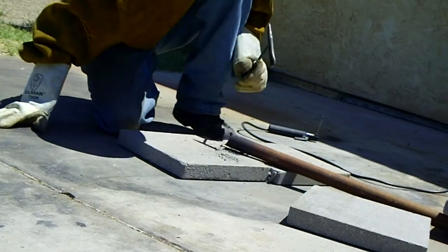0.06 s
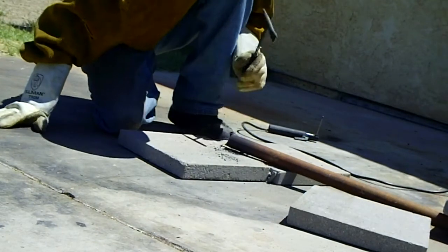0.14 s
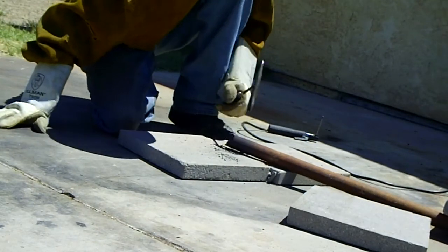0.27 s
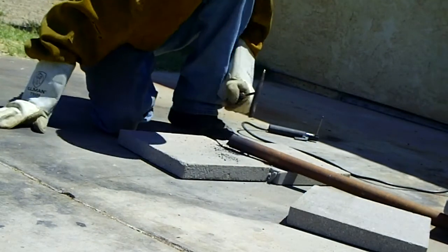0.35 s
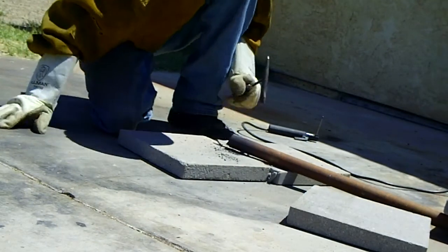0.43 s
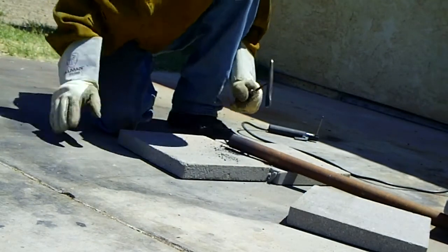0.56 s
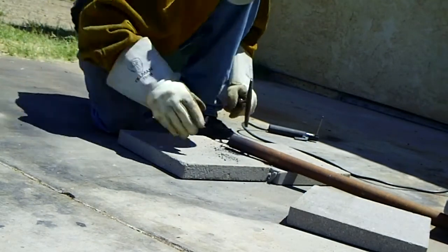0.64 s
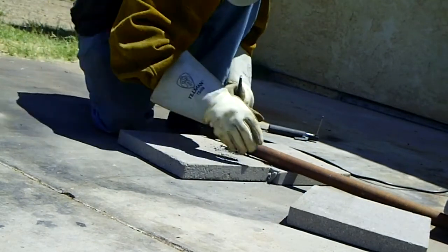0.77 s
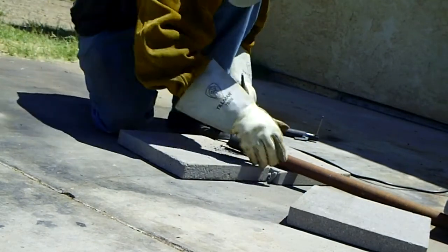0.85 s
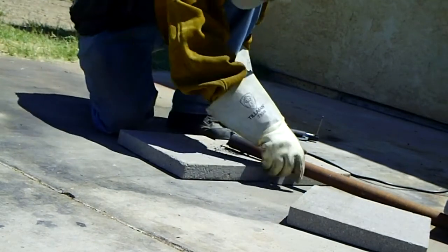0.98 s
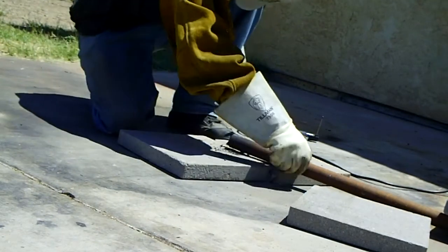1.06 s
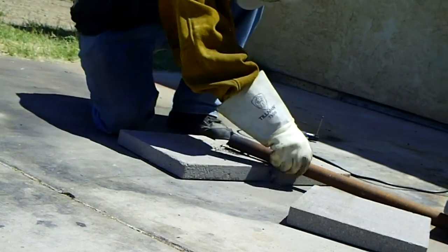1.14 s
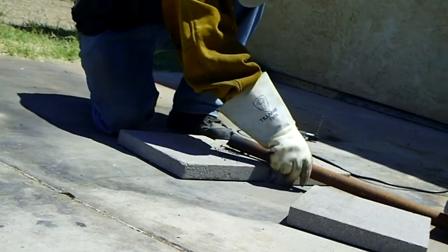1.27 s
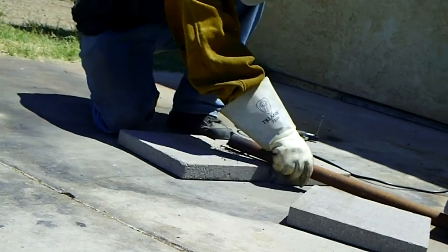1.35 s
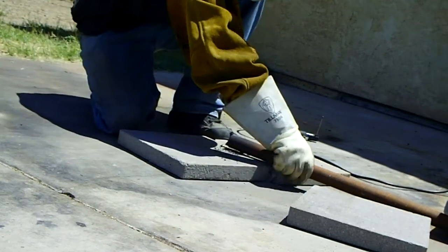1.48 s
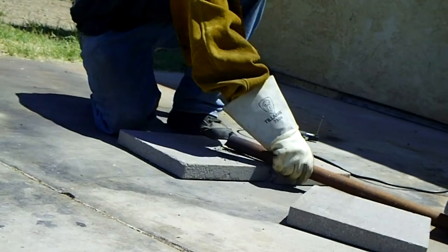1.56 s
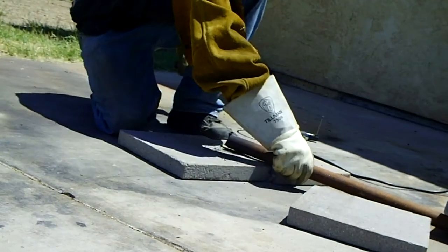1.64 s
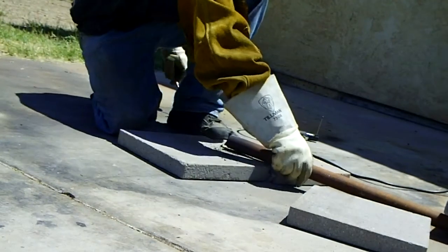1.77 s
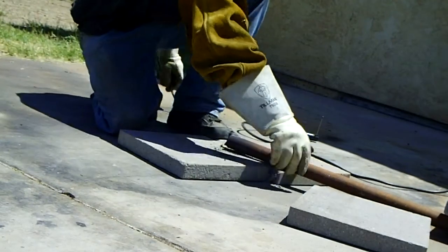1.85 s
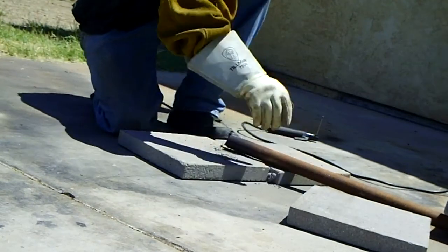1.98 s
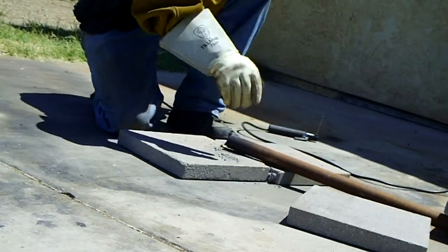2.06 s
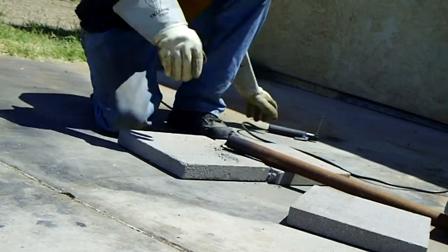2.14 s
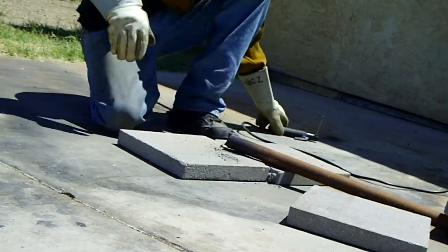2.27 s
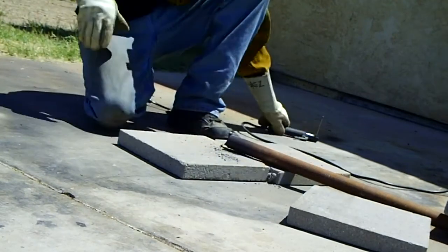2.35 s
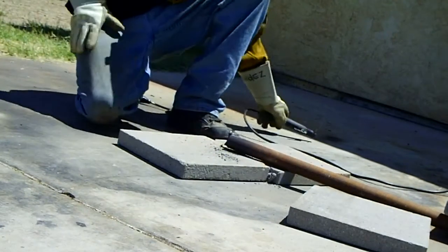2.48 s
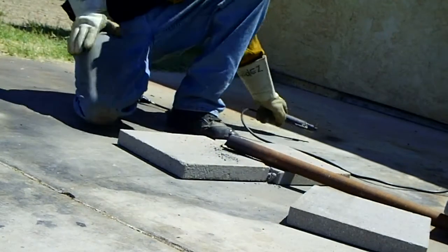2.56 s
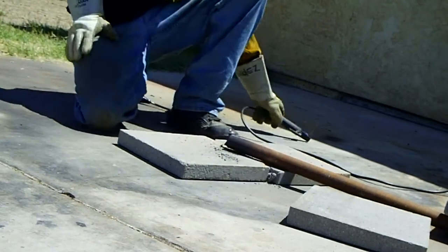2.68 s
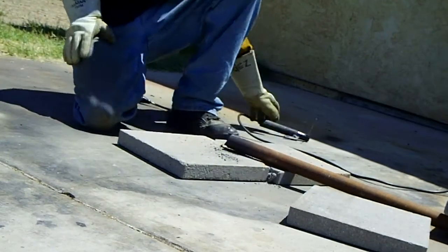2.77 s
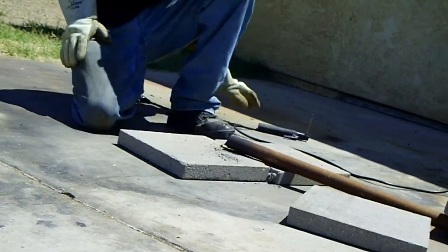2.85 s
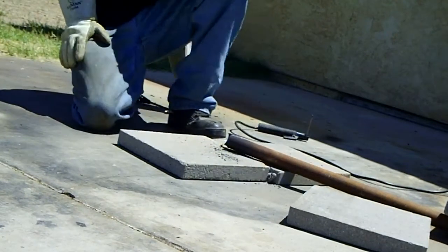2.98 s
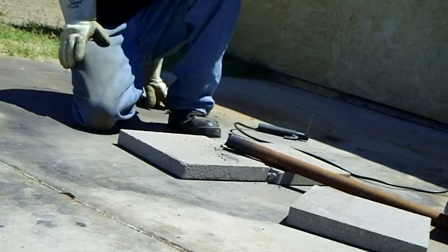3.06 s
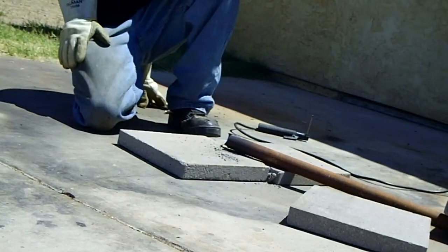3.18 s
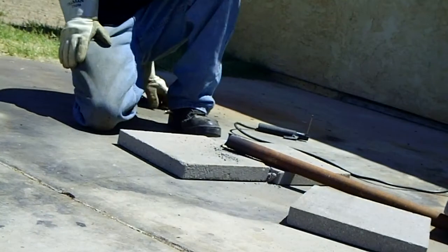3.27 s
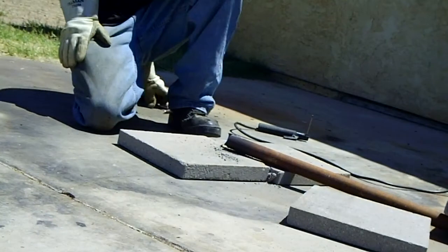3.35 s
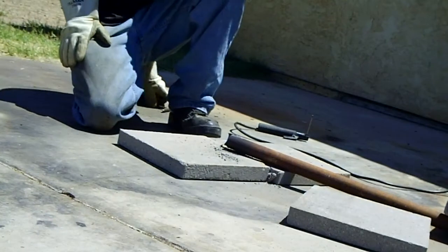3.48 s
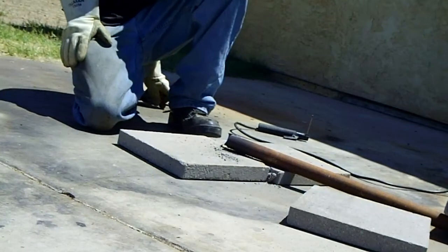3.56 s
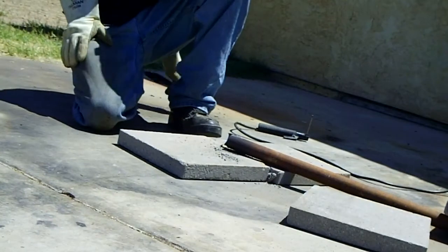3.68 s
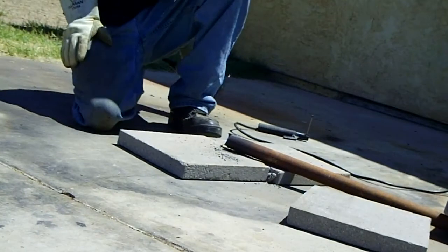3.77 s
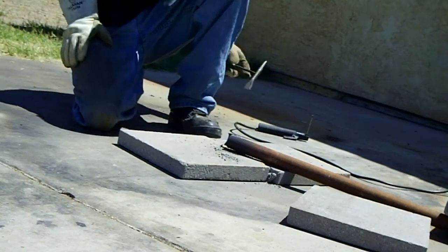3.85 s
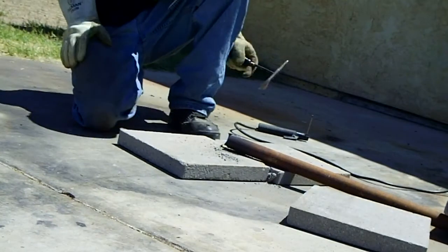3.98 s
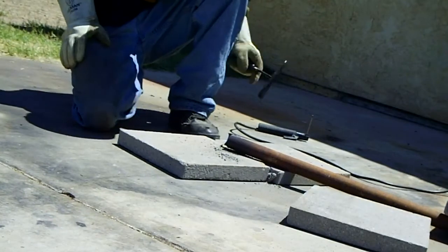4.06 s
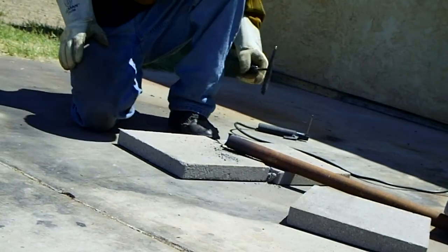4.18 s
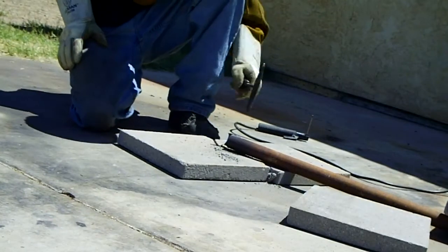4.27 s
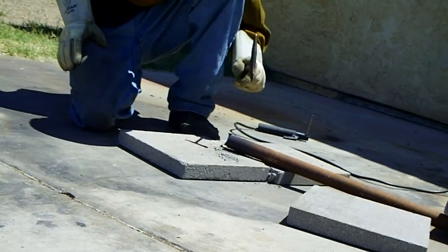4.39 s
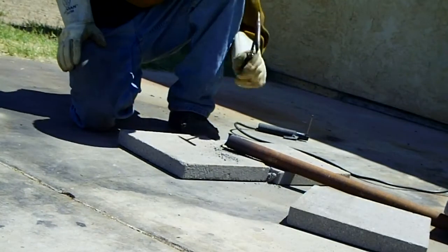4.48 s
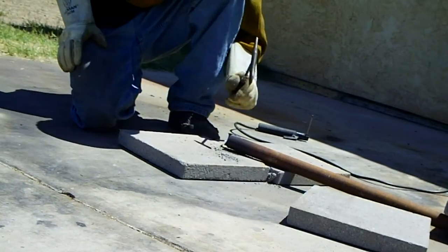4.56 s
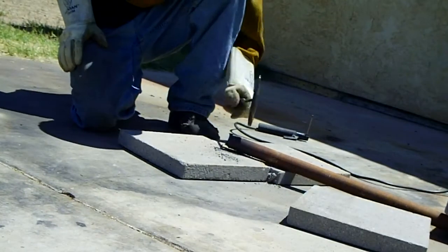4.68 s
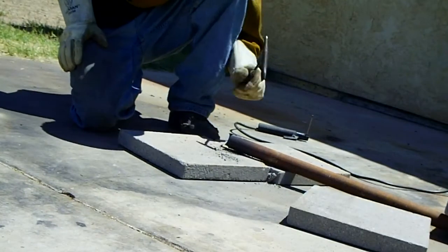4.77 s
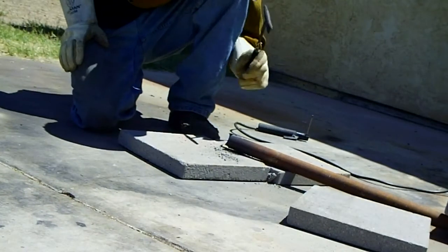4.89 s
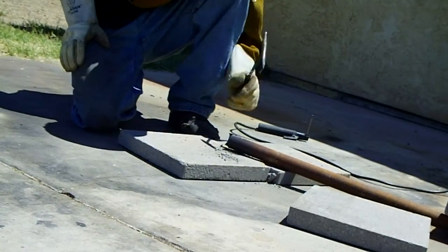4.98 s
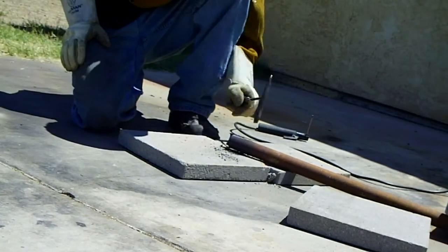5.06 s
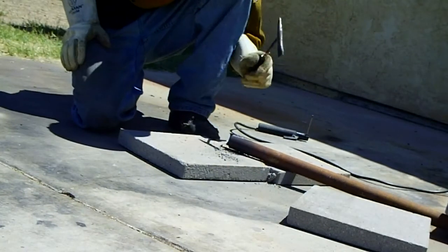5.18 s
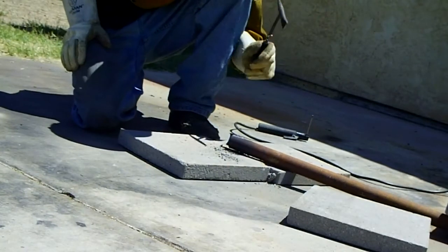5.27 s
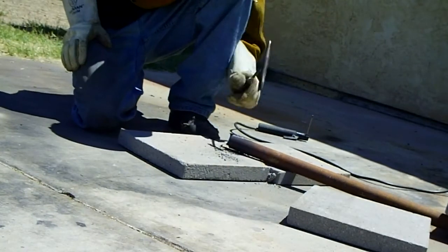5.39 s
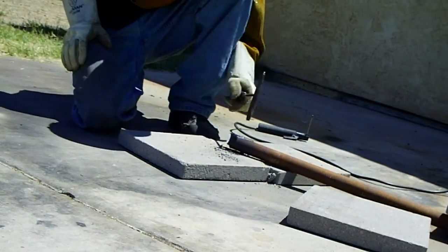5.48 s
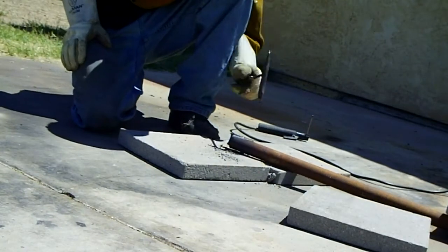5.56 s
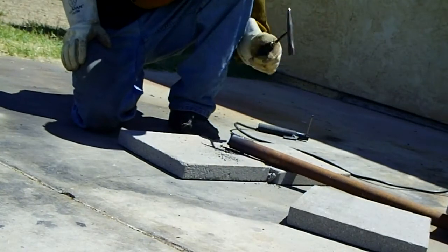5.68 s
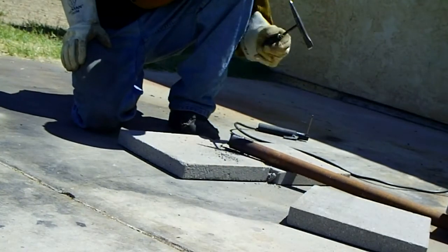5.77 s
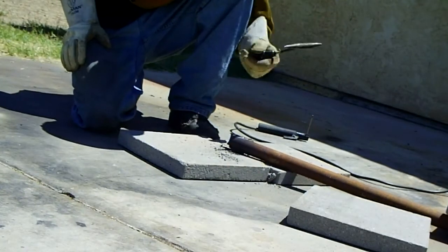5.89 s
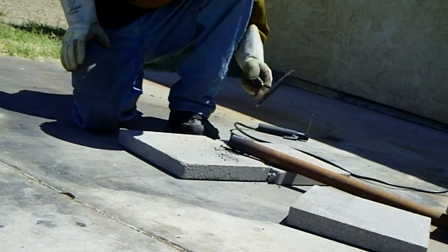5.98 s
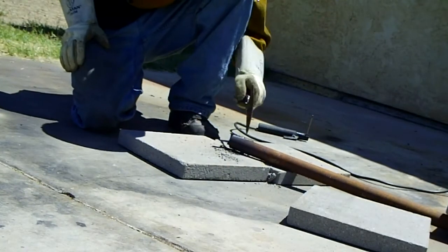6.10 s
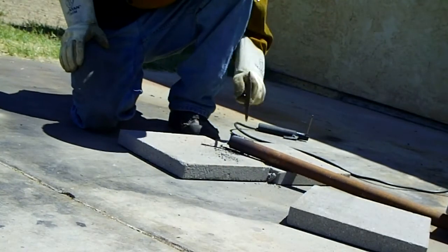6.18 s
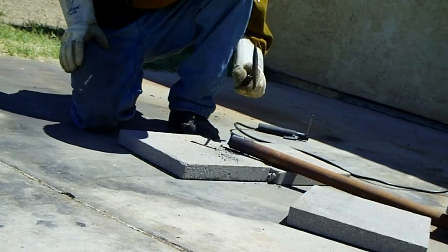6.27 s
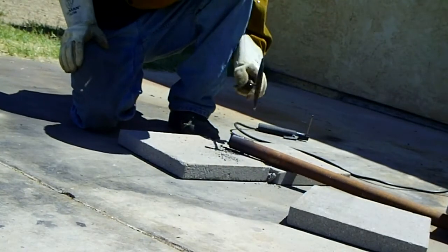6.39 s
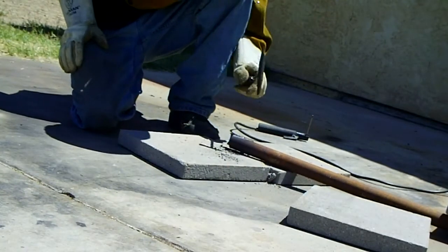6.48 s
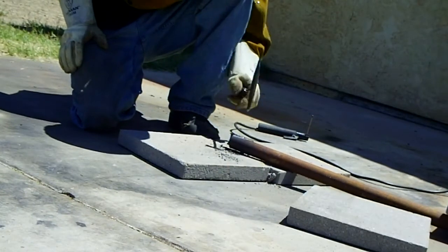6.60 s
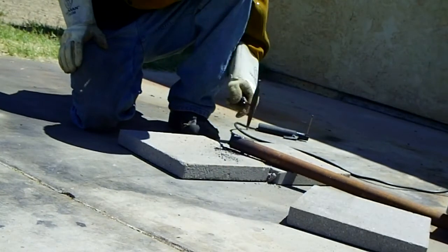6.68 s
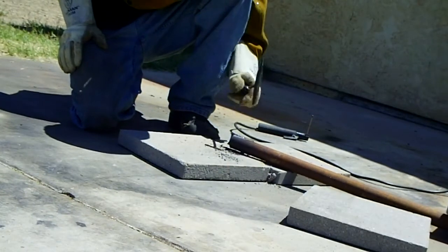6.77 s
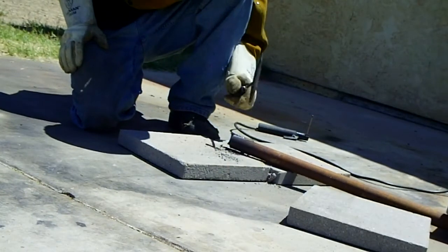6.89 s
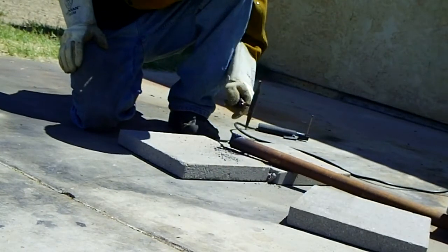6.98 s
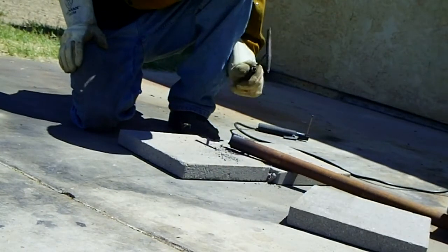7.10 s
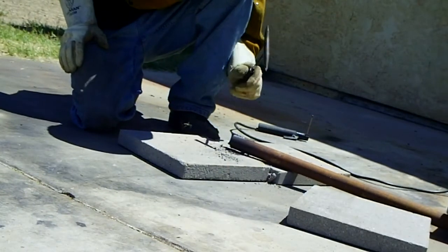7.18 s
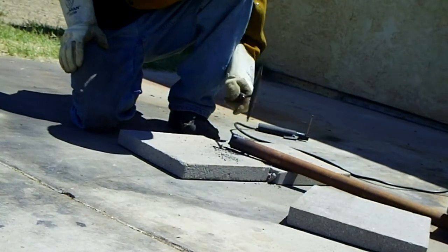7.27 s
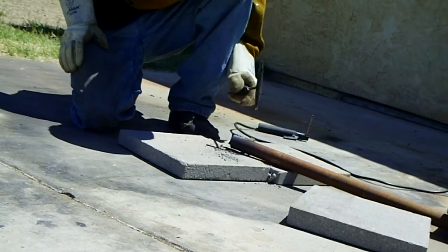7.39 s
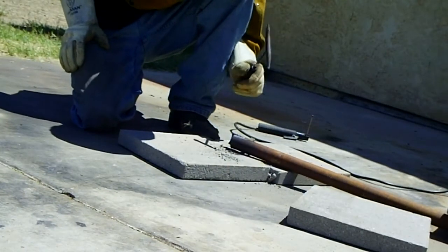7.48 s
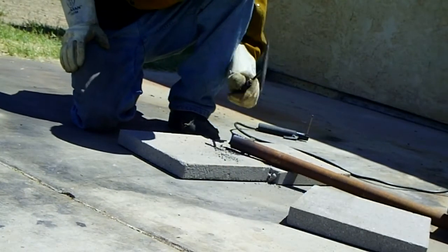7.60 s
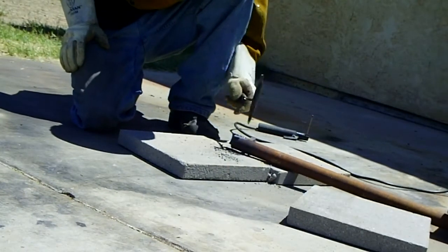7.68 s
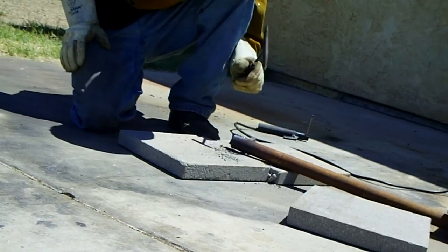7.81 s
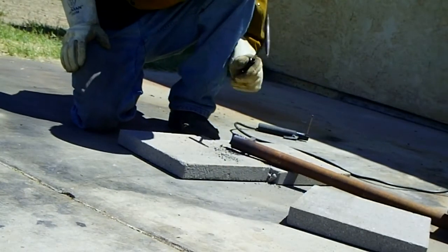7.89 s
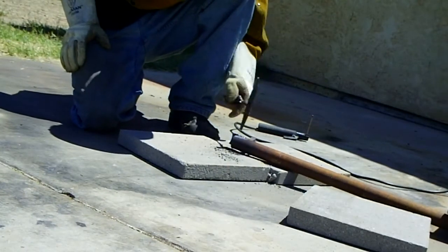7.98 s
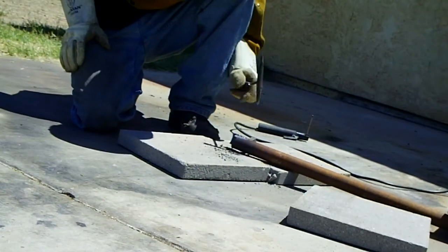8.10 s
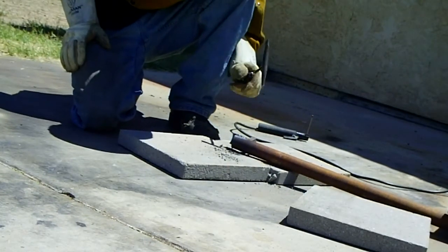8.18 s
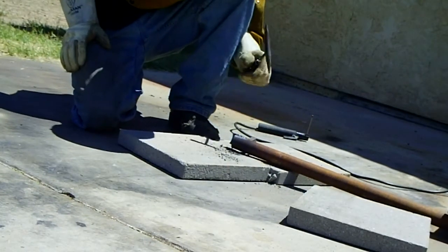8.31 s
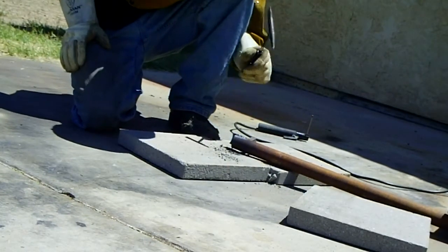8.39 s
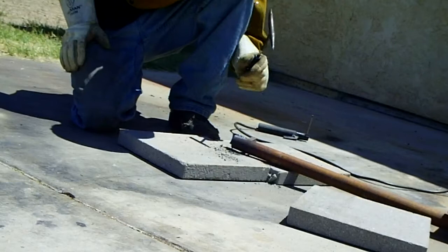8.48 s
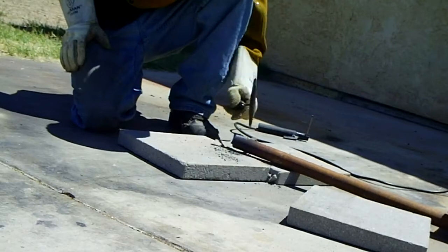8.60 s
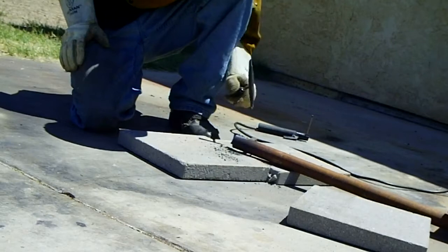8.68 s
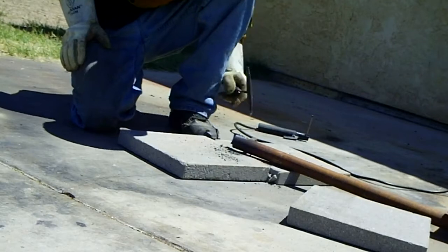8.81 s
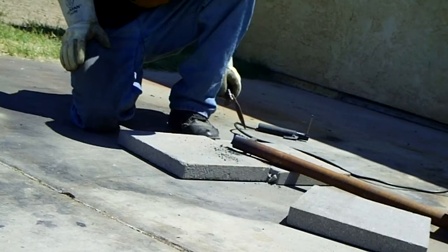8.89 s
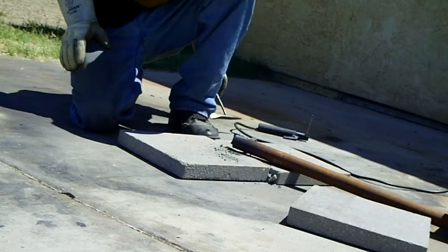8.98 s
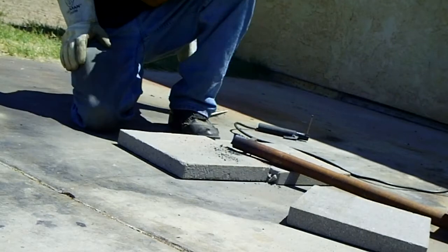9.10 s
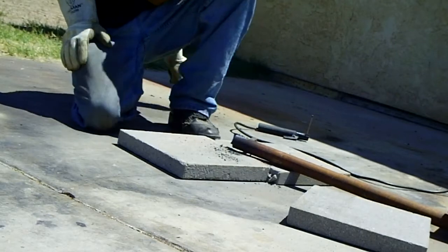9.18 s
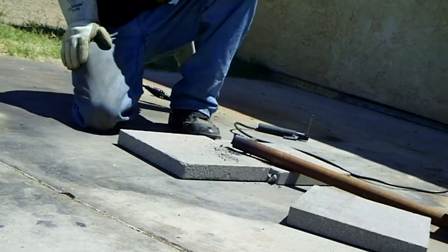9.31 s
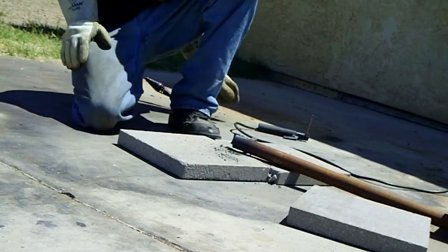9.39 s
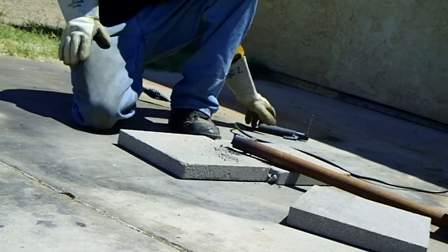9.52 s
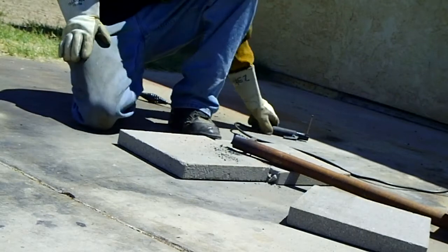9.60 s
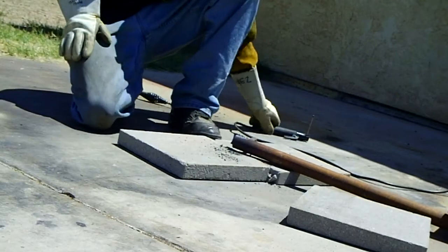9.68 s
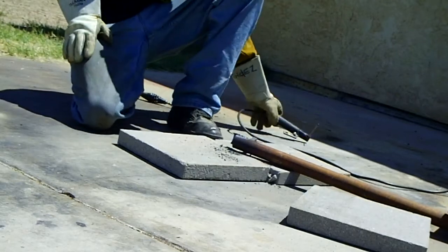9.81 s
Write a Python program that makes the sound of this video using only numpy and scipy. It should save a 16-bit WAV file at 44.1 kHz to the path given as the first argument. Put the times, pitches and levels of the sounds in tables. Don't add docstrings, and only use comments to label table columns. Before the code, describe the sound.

A hammer strikes a steel bar outdoors in sharp ringing blows, slag cracking and chips ticking over concrete, with a distant engine hum and bird chirps.

```python
import sys
import numpy as np
from scipy import signal
from scipy.fft import rfft, irfft, next_fast_len
from scipy.io import wavfile

SR = 44100
rng = np.random.default_rng(int(sys.argv[2]) if len(sys.argv) > 2 else 0)


def magnitude_from_level(level_db):
    exponent = np.asarray(level_db, float) / 20
    return 10 ** exponent


def output_pcm(signal):
    pcm = np.clip(np.atleast_2d(signal).T, -1, 1) * 32767
    wavfile.write(sys.argv[1], SR, np.round(pcm).astype(np.int16))


N = 434385
LEAD = 8820
LENGTH = N + LEAD

# time in seconds, force on the bar in dB, low head mode in dB,
# high head mode in dB, thud of the block in dB.
BLOWS = [
    (0.3, 5, 4.5, -3, -16),
    (4.638, 5.5, 7.5, -6.5, -23.5),
    (5.032, 5, 2, -2, -14),
    (5.448, 5.5, -2, -3, -13),
    (6.66, 1.5, -2.5, -0.5, -32),
    (6.96, 3, -3, -3.5, -31.5),
    (7.298, -1.5, -3.5, -5.5, -11.5),
    (7.647, 5, -1.5, 0.5, -15.5),
    (8.007, 1, -1, -4, -12),
    (8.594, 3.5, 4, -3, -10.5),
]
EARLIER_BLOW = [
    (-0.11, -2, 0.5, -7, -39),
]


def rms_one(x):
    return x / np.sqrt(np.mean(x ** 2) + 1e-20)


def in_time(rows):
    s, *columns = np.transpose(rows)
    seconds = (np.arange(LENGTH) - LEAD) / SR
    return [np.interp(seconds, s, column) for column in columns]


def drift(rate_hz):
    r = np.exp(-80 * np.pi * rate_hz / SR)
    noise = rng.standard_normal(LENGTH // 40 + 2002)
    slow = signal.lfilter([1], [1, -2 * r, r * r], noise)[2000:]
    return np.interp(np.arange(LENGTH) / 40, np.arange(len(slow)), rms_one(slow))


def clicks(times, heights):
    force = np.full(LENGTH, 1e-18)
    force[np.round(np.asarray(times) * SR).astype(int) + LEAD] = heights
    return force


def ring(force, hz, t60):
    r = magnitude_from_level(-60 / (t60 * SR))
    w = 2 * np.pi * hz / SR
    return signal.lfilter([0, np.sin(w)], [1, -2 * r * np.cos(w), r * r], force)


def dying(force, t60):
    return signal.lfilter([1], [1, -magnitude_from_level(-60 / (t60 * SR))], np.abs(force))


def butter(order, hz, kind, x):
    return signal.sosfilt(signal.butter(order, hz, kind, fs=SR, output="sos"), x)


def coloured(spectrum, flicker_db):
    size = next_fast_len(LENGTH)
    hz = np.maximum(np.fft.rfftfreq(size, 1 / SR), 1)
    point_hz, point_db = np.transpose(spectrum)
    gain = magnitude_from_level(np.interp(np.log(hz), np.log(point_hz), point_db))
    shaped = rfft(rng.standard_normal(size)) * gain
    out = 0
    for octave in range(10):
        share = np.clip(1 - np.abs(np.log2(hz / 25) - octave), 0, 1)
        patch = irfft(shaped * np.sqrt(share), size)[:LENGTH]
        out = out + patch * magnitude_from_level(flicker_db * drift(2.3))
    return rms_one(out)


def hammer():
    # time in seconds, level in dB.
    rebounds = [
        (4.726, -13),
        (5.524, -7),
        (7.354, -21),
        (8.061, -28.5),
    ]
    # time in seconds, change of level in dB.
    chokes = [(0.352, -4.5), (4.69, -13), (5.073, -3), (5.487, -5.5), (6.699, -3), (6.747, -5.5),
              (7.002, -9), (7.328, -12.5), (7.688, -4.5), (8.034, -10.5), (8.665, 0.5), (8.71, -24)]
    twins_hz = [2998, 3040]
    # frequency in Hz, level in dB.
    upper = [(3095, -11), (3219, -13), (3564, -14), (4043, -14), (4387, -18), (4831, -19), (5304, -20),
             (5865, -21), (8600, -27)]
    blow_t60, rebound_t60, upper_t60 = .29, .22, .065
    after_db, after_t60 = -38.5, .82
    grip_power = 1.4
    twin_lag = -1.9

    blows = np.array(EARLIER_BLOW + BLOWS)
    touches = [(s, low_db, high_db, blow_t60) for s, _, low_db, high_db, _ in blows]
    touches += [(s, db, db - 11, rebound_t60) for s, db in rebounds]
    t = np.arange(SR // 2) / SR
    sag = 12.9 * 0.055 * np.expm1(-t / 0.03)
    low = np.sin(2 * np.pi * (twins_hz[0] * t + sag))
    high = np.sin(2 * np.pi * (twins_hz[1] * t + sag) + twin_lag)
    out = np.zeros(LENGTH + SR)
    for s, low_db, high_db, t60 in touches:
        fade = magnitude_from_level(-60 * (t / t60) ** grip_power) + magnitude_from_level(after_db - 60 * t / after_t60)
        choke_db = sum(db * np.clip((s + t - when) / .004, 0, 1) for when, db in chokes if s < when < s + .12)
        onset = np.minimum(t / 0.003, 1)
        at = round(s * SR) + LEAD
        out[at:at + len(t)] += (magnitude_from_level(low_db) * low + magnitude_from_level(high_db) * high) * fade * magnitude_from_level(choke_db) * onset
    out = out[:LENGTH]
    for hz, db in upper:
        luck_db = 5 * rng.standard_normal(len(blows))
        out += ring(clicks(blows[:, 0], magnitude_from_level(blows[:, 1] + 4 + db + luck_db)), hz, upper_t60)
    return out


def bar():
    # time in seconds, force in dB, rattle in dB.
    bounces = np.array([(0.008, -19, -25), (0.348, -12, -24), (0.386, -5.5, -20), (0.412, -20, -40),
                        (0.476, -17.5, -38), (4.66, -13, -14.5), (4.687, -13.5, -22), (4.726, -4.5, -15.5),
                        (4.789, -13.5, -39), (5.057, -2.5, -18), (5.088, 3, -6), (5.148, -13, -31),
                        (5.465, -23, -18), (5.501, 5, -10), (6.679, -13.5, -11.5), (6.727, -7, -28),
                        (6.977, -9.5, -22), (7.332, -4.5, -21.5), (7.37, -7.5, -26), (7.695, -2.5, -15),
                        (7.73, -6, -22.5), (8.054, -0.5, -39), (8.108, -12.5, -23), (8.172, -23, -38),
                        (8.661, -10, -27)])
    # frequency in Hz, level in dB, t60 in seconds.
    modes = [(310, -14, 0.082), (404.4, -12, 0.055), (525, -13.5, 0.075), (590, -15.5, 0.1),
             (674.7, -22, 0.11), (905, -28.5, 0.021), (1156.6, -12, 0.061), (1315, -18.5, 0.034),
             (1518, -20.5, 0.1), (1501, -11, 0.033), (1638, -13.5, 0.059), (1715, -8.5, 0.045),
             (1756, -13, 0.11), (1829, -15.5, 0.11), (2018, -23.5, 0.16), (2110, -22, 0.042),
             (2246, -24.5, 0.048), (2558, -16.5, 0.04)]
    # frequency in Hz, level in dB per Hz.
    crack = [(90, -38.5), (160, -17.5), (850, -14), (1730, -12), (2500, -19), (3400, -10), (4660, -27.5),
             (8620, -28.5), (13000, -33.5)]
    block_hz, block_t60, bounce_thud_db = 148, .19, -31.5
    crack_db, crack_follows = -6, 1
    hard_tilt_db = 3

    blows = np.array(EARLIER_BLOW + BLOWS)
    times = np.r_[blows[:, 0], bounces[:, 0]]
    force_db = np.r_[blows[:, 1] + 4.5, bounces[:, 1] - 2.5]
    tilt_db = np.r_[np.full(len(blows), hard_tilt_db), np.zeros(len(bounces))]
    thud_db = np.r_[blows[:, 4], np.full(len(bounces), bounce_thud_db)]
    luck = rng.standard_normal((len(times), len(modes)))
    out = ring(clicks(times, magnitude_from_level(thud_db)), block_hz, block_t60)
    for k, (hz, level_db, t60) in enumerate(modes):
        strike_db = force_db + level_db + tilt_db * np.log2(hz / 1700) + 2.4 * luck[:, k]
        out += ring(clicks(times, magnitude_from_level(strike_db) * np.sign(luck[::-1, k])), hz, t60)
    out = butter(2, [125, 2800], "band", out)

    slag = clicks(blows[:, 0], magnitude_from_level(crack_db + crack_follows * blows[:, 1]))
    rattle = dying(clicks(bounces[:, 0], magnitude_from_level(bounces[:, 2])), .07)
    burst = dying(slag, 0.1) + signal.lfilter([.01], [1, -.99], rattle)
    debris = magnitude_from_level(-22) * dying(slag, .4) * magnitude_from_level(4 * drift(45))
    return out + (burst + debris) * coloured(crack, flicker_db=2.5)


def generator():
    # time in seconds, firing rate in Hz, load in dB, screening by the welder's body in dB.
    engine = [(0, 92.5, -51.5, -13.5), (1, 91.52, -44.5, 0), (1.9, 95.6, -46, -3.5), (2.8, 95, -54, -6),
              (4.4, 91.5, -45.5, 1.5), (5.4, 92.5, -41, -6), (5.8, 92.3, -37, -3.5),
              (6.5, 91.64, -44.5, -13), (8, 93.74, -47.5, -15), (9, 93.8, -43, -22), (9.85, 94.1, -38, -45)]
    # level in dB, share of the screening.
    exhaust = [
        (-44, 1),
        (-45, 0.16),
    ]
    # multiple of the firing rate, level in dB.
    half_orders = [(.5, -53.5), (1.28, -56.5), (1.5, -54)]
    # frequency in Hz, level in dB rms.
    whine = [(489, -54), (978, -54), (1467, -63.5), (1677, -56.5), (1956, -62)]
    # frequency in Hz, level in dB per Hz.
    rush = [(18, -10.5), (45, 5.5), (170, -9.5), (260, -8), (420, -12.5), (600, -7.5), (750, -11),
            (860, -5), (1100, -13), (1180, -15.5), (1780, -9), (2100, -22.5), (4000, -31), (10500, -43)]
    rush_db = -43.5

    firing_hz, load_db, screen_db = in_time(engine)
    order_db = [load_db] + [db + share * screen_db for db, share in exhaust]
    turn = 2 * np.pi * np.cumsum(firing_hz) / SR
    out = magnitude_from_level(rush_db) * coloured(rush, flicker_db=1.3)
    for order, db in enumerate(order_db, 1):
        out += magnitude_from_level(db - 3 + 1.4 * drift(1.7)) * np.sin(order * turn)
    for order, db in half_orders:
        out += magnitude_from_level(db + 1.5 + 1.1 * drift(3.5)) * np.sin(order * turn)
    wander = np.cumsum(1 + 0.00086 * drift(2.5)) / SR
    for hz, db in whine:
        out += magnitude_from_level(db + 3.0 + 2.0 * drift(24)) * np.sin(2 * np.pi * hz * wander)
    return out


def birds():
    # time in seconds, start pitch in Hz, end pitch in Hz, level in dB.
    chirps = [(0.063, 2493, 4200, -34), (0.234, 2330, 4540, -33), (0.645, 2250, 2670, -48),
              (.94, 2310, 2690, -48), (1.011, 2280, 2800, -47), (1.167, 4650, 3010, -54),
              (1.223, 3370, 2530, -51), (2.96, 2410, 2810, -60), (3.02, 5250, 5270, -64),
              (3.12, 4250, 4330, -61), (3.58, 4300, 4350, -74), (3.75, 5270, 5310, -71.5),
              (4.36, 2800, 2440, -54.5), (5.91, 4820, 3160, -54.5), (5.941, 2600, 3230, -46.5),
              (6.217, 2660, 3240, -47), (6.411, 3850, 5940, -54.5), (6.468, 3400, 3800, -58.5),
              (6.589, 2944, 3050, -51.5), (6.906, 3950, 4100, -52), (8.45, 3020, 2590, -48.5),
              (9.07, 3660, 4200, -65.5)]
    whistles = [
        (0.487, 4585, 4120, -40.5),
        (0.561, 4440, 4350, -59),
        (1.72, 2730, 2730, -57),
        (7.849, 4100, 3970, -58),
    ]
    chirp_s, whistle_s = .047, .14
    hoarse_least, hoarse_per_octave = .21, .75

    out, flutter = np.zeros(LENGTH), drift(220)
    notes = [(chirp_s, note) for note in chirps] + [(whistle_s, note) for note in whistles]
    for length, (s, start_hz, end_hz, db) in notes:
        octaves = abs(np.log2(end_hz / start_hz))
        hoarse = min(hoarse_least + hoarse_per_octave * octaves, .8)
        at, count = round(s * SR) + LEAD, round(length * SR)
        tone = np.sin(2 * np.pi * np.cumsum(np.linspace(start_hz, end_hz, count)) / SR)
        voice = 1 - hoarse + hoarse * flutter[at:at + count]
        out[at:at + count] += magnitude_from_level(db + 0.5) * np.sqrt(np.hanning(count)) * tone * voice
    return out


def handling():
    # time in seconds, length in seconds, scuff in dB, ring in Hz, ring in dB.
    drags = [(0.246, .03, -47, 5970, -74), (1.464, 0.046, -55.5, 8600, -56), (1.488, 0.041, -53, 3370, -42),
             (1.515, 0.023, -42.5, 8900, -49), (1.522, 0.058, -55, 3050, -44), (1.667, 0.6, -64, 2720, -49),
             (1.61, 0.083, -60, 8560, -62), (1.666, 0.049, -59, 3540, -46.5),
             (2.814, 0.0084, -53, 1470, -33), (2.821, 0.023, -47, 2150, -37), (3.39, .02, -70, 9500, -69),
             (3.402, 0.058, -56, 6300, -60), (3.52, .05, -70, 9400, -67), (9.407, 0.035, -54.5, 4600, -62),
             (9.458, 0.049, -59, 2840, -42)]
    # time in seconds, head in dB, handle against head in dB.
    set_downs = [
        (1.879, -4, 4),
        (9.192, 3, -2),
    ]
    # delay in seconds, scuff in dB, ring in Hz, ring in dB.
    contacts = [
        (-.049, -59, 9400, -60),
        (-0.049, -65, 4260, -54),
        (0, -43, 4250, -30.5),
        (-.004, -70, 1325, -19),
        (-0.0071, -68, 2060, -32),
    ]
    contact_s, handle_top_hz = .026, 3000
    t60_at_4k, t60_rises = .045, 1.5

    laid = [(s + delay, contact_s, db + scuff_db, hz, db + ring_db + handle_db * (hz < handle_top_hz))
            for s, db, handle_db in set_downs for delay, scuff_db, hz, ring_db in contacts]
    grit = rng.standard_normal(LENGTH) * magnitude_from_level(4.7 * drift(129.3))
    out = np.zeros(LENGTH + SR)
    for s, length, scuff_db, hz, ring_db in drags + laid:
        t60 = t60_at_4k * (hz / 4000) ** t60_rises
        at = round(s * SR) + LEAD
        stroke = np.hanning(round(2 * length * SR))[round(.8 * length * SR):]
        force = np.r_[stroke * grit[at:at + len(stroke)], np.zeros(SR // 3)] + 1e-18
        scuff = magnitude_from_level(scuff_db) * butter(1, [900, 8000], "band", force)
        rung = magnitude_from_level(ring_db) * ring(force, hz, t60) / np.sqrt(len(stroke) / 4)
        out[at:at + len(force)] += scuff + rung
    return out[:LENGTH]


def spits():
    # time in seconds, level in dB.
    snaps = [
        (.41, -26),
        (4.835, -28),
        (5.297, -31),
        (7.048, -13),
        (7.14, -28),
        (7.97, -38),
    ]
    s, db = np.transpose(snaps)
    return butter(2, 5000, "high", clicks(s, magnitude_from_level(db + 6)))


def chips():
    # time in seconds, peak in dB, pitch in Hz, brightness in dB.
    single = [(0.8894, -45, 2640, 4), (0.9888, -40, 2470, -1), (1.045, -49, 2730, 3),
              (1.077, -29, 2920, -19), (1.1033, -30.5, 2520, -5), (1.745, -33.5, 3000, -4.5),
              (2.1083, -40, 2624, -2), (2.6134, -47, 2820, 0), (2.711, -34, 2710, -16),
              (2.7811, -38, 2780, -8), (2.8364, -27.5, 2760, -10)]
    # time in seconds, first hop in seconds, peak in dB, pitch in Hz, brightness in dB.
    skips = [
        (2.0323, .189, -20.5, 3060, 8.5),
        (9.31, .192, -15.5, 2900, 2.5),
    ]
    landings = [4, 7]
    hop_loss_db = [6.5, 4.5]
    hop_kept, roll_s = .575, .012
    overtone = 2.12
    tick_level_db, tick_follows = -2.5, .4

    hops = []
    for (s, hop, db, hz, bright_db), count, loss_db in zip(skips, landings, hop_loss_db):
        for k in range(count):
            flight = hop * (1 - hop_kept ** k) / (1 - hop_kept)
            hops.append((s + flight + roll_s * k, db - loss_db * k, hz, bright_db))
    out, t = np.zeros(LENGTH), np.arange(600) / SR
    for s, peak_db, hz, bright_db in single + hops:
        low = np.sin(2 * np.pi * hz * t) * magnitude_from_level(-60 * t / .007)
        high = magnitude_from_level(bright_db) * np.sin(2 * np.pi * overtone * hz * t) * magnitude_from_level(-60 * t / .0025)
        grit = rng.standard_normal(len(t)) * magnitude_from_level(-60 * t / .0072)
        tick = magnitude_from_level(tick_level_db + tick_follows * bright_db) * butter(2, [2600, 9800], "band", grit)
        at = round(s * SR) + LEAD
        out[at:at + len(t)] += magnitude_from_level(peak_db - 4.5) * (low + high + tick)
    return out


def yard(x, near_db=0, far_db=0, reach=1):
    # delay in seconds, level in dB.
    echoes = [(.0045, -8.5), (0.015, -13), (0.019, -20), (.035, -21.5)]
    near_level_db, near_t60 = -2.5, .17 * reach
    far_level_db, far_t60 = -25, .92

    t = np.arange(SR) / SR
    response = np.zeros(SR)
    for lag, db in echoes:
        response[round(lag * SR)] = magnitude_from_level(db)
    near, far = rng.standard_normal((2, SR))
    near = butter(1, 700, "high", near)
    near *= magnitude_from_level(near_level_db - 60 * t / near_t60) * np.sqrt(14 / near_t60 / SR)
    response += near * np.minimum(t / 0.0033, 1)
    far = signal.lfilter([.6], [1, -.4], far) * np.minimum(t / 0.054, 1)
    far *= magnitude_from_level(far_level_db + far_db - 60 * t / far_t60) * np.sqrt(14 / far_t60 / SR)
    return x + signal.fftconvolve(x, magnitude_from_level(near_db) * response + far)[:LENGTH]


def scene():
    mix = yard(hammer(), near_db=-7, far_db=-6.5)
    mix += yard(bar() + handling(), near_db=-2.5)
    mix += yard(chips(), near_db=4.0, reach=0.77)
    mix += yard(birds(), far_db=19.5)
    mix += spits() + generator()
    return mix[None, LEAD:]


def roll_off(x):
    return signal.sosfilt(signal.butter(12, 16830, fs=SR, output="sos"), x)


def record(dry):
    mic_top_hz, clip_level = 10900, .565
    heard = butter(6, mic_top_hz, "low", dry)
    clipped = heard / (1 + np.abs(heard / clip_level) ** 12) ** (1 / 12)
    body = butter(6, 0.97 * mic_top_hz, "low", clipped)
    fizz = magnitude_from_level(-6.5) * butter(2, 14000, "high", clipped)
    top_cut = signal.cheby2(8, 30, 16350, fs=SR, output="sos")
    return roll_off(signal.sosfilt(top_cut, body + fizz))


dry = scene()
out = record(dry)
output_pcm(out)
```